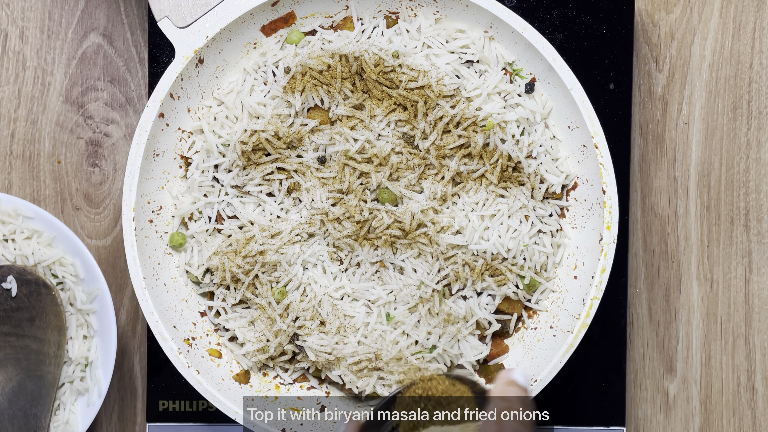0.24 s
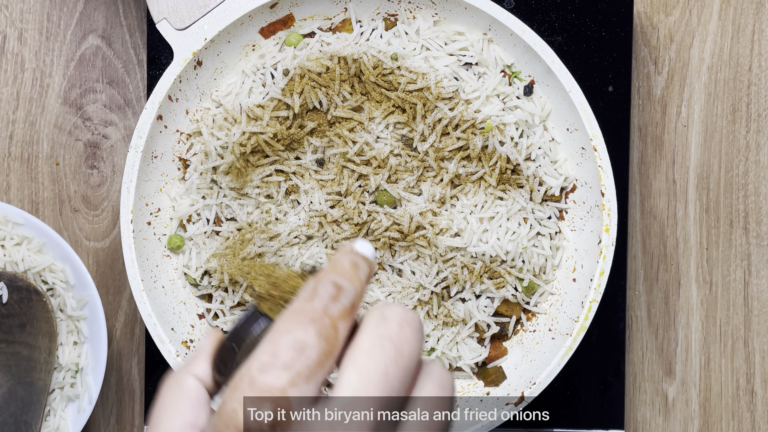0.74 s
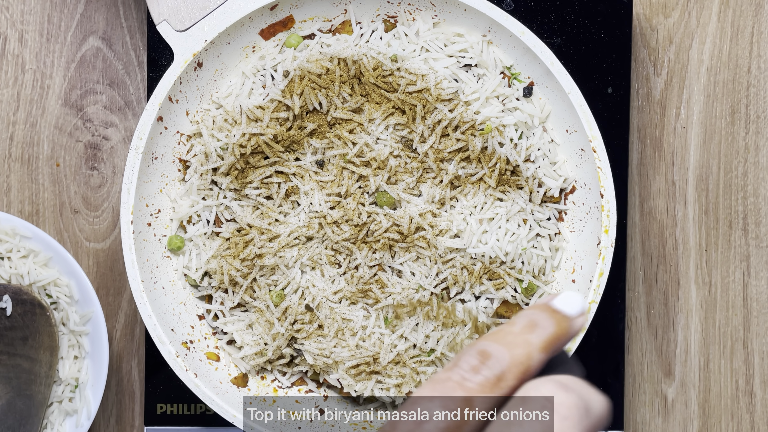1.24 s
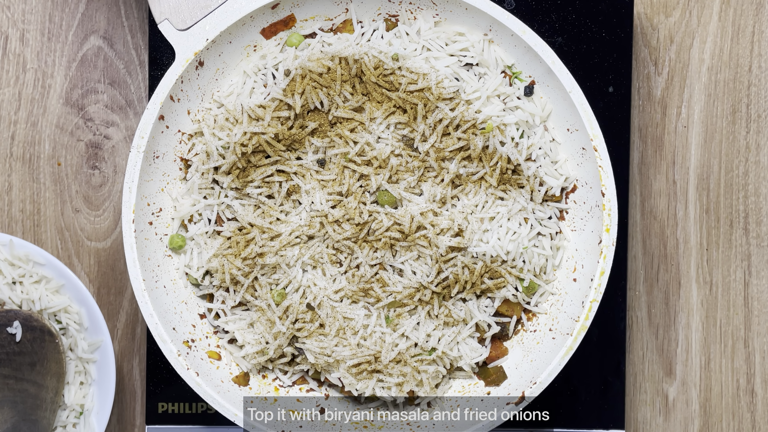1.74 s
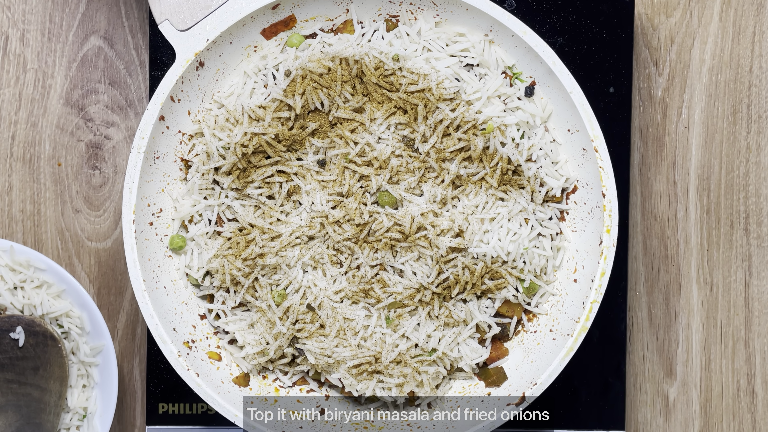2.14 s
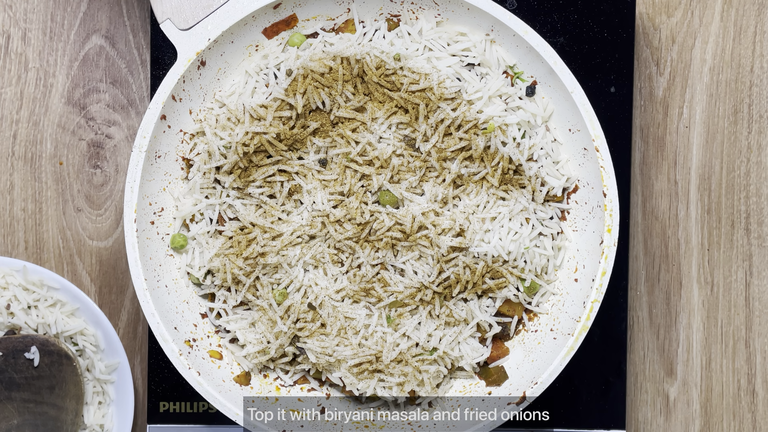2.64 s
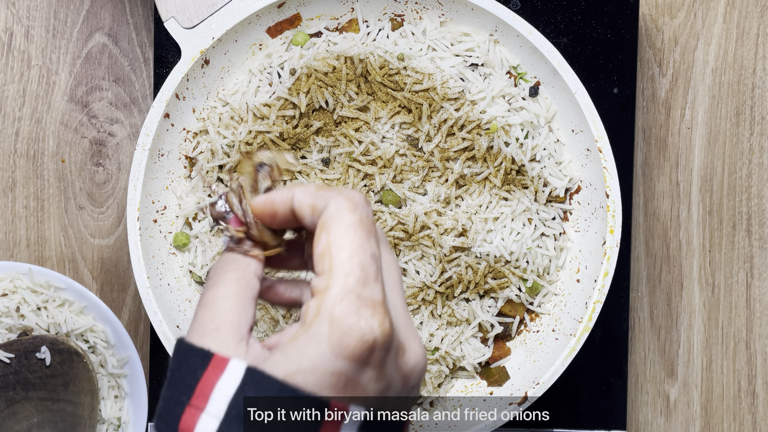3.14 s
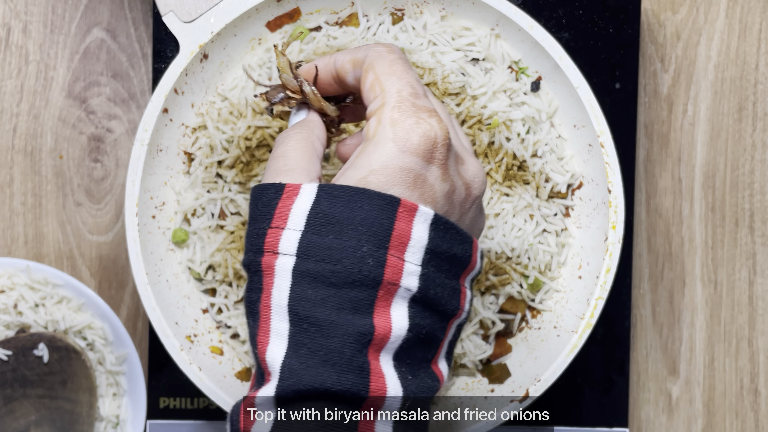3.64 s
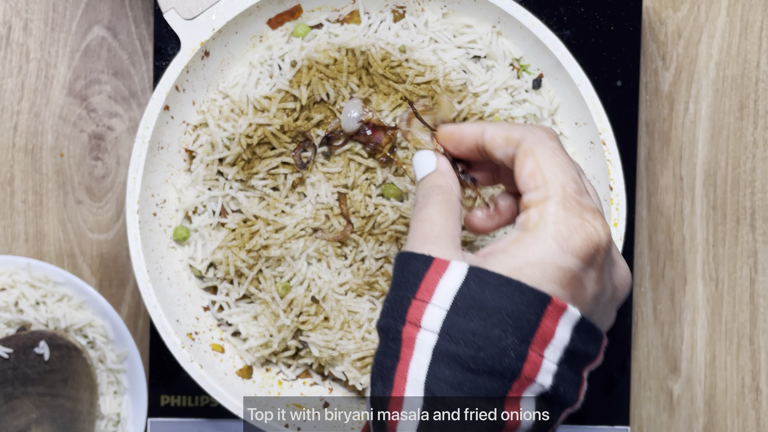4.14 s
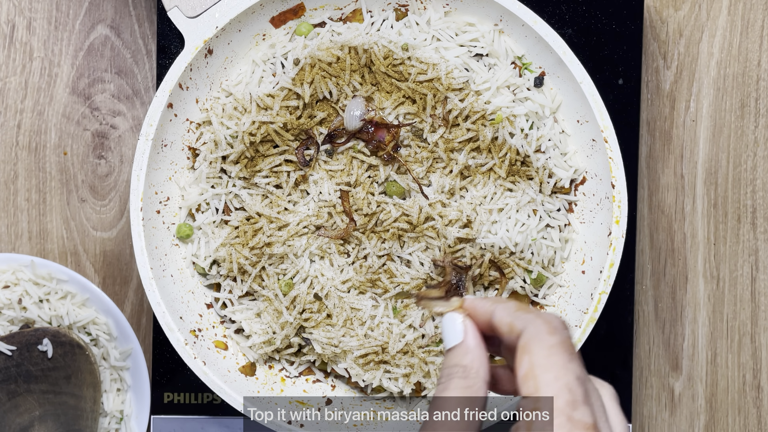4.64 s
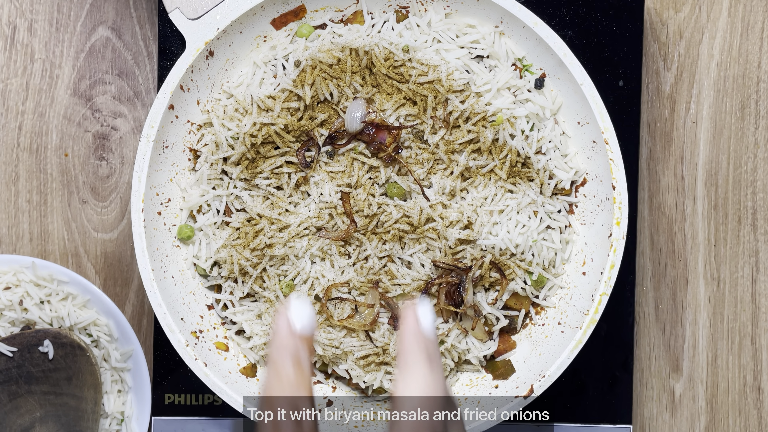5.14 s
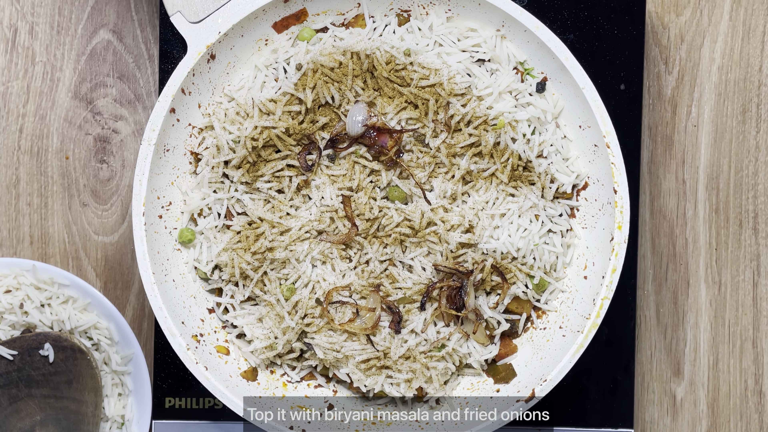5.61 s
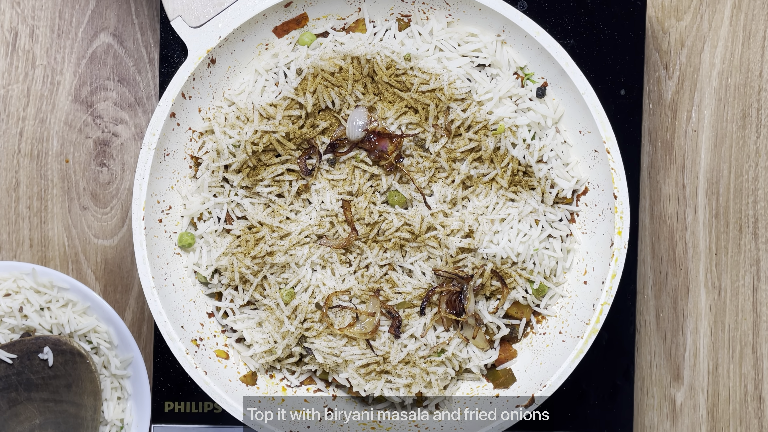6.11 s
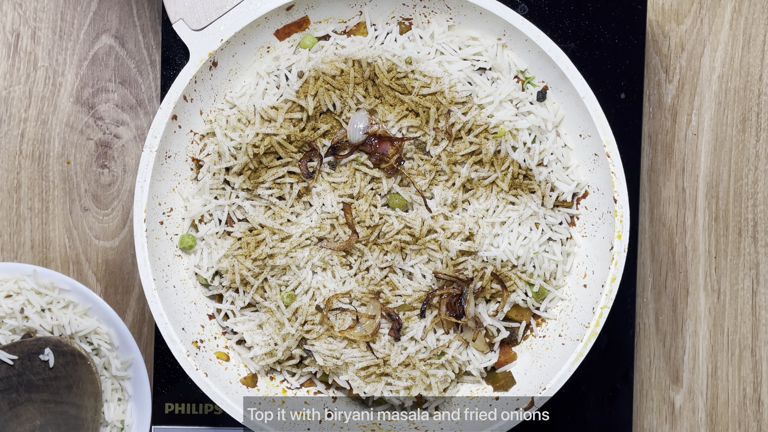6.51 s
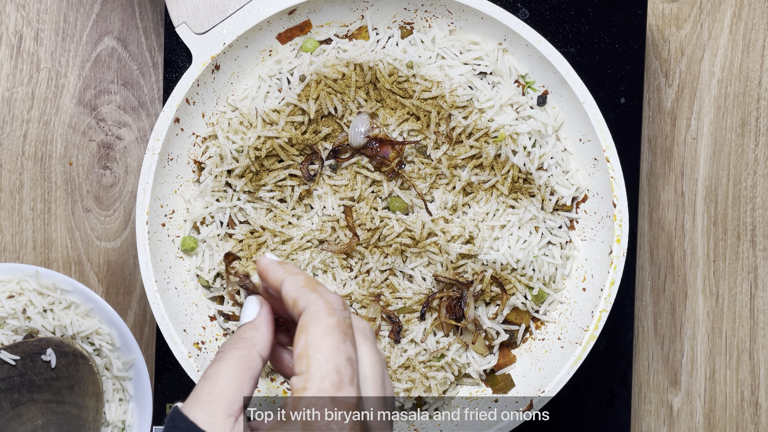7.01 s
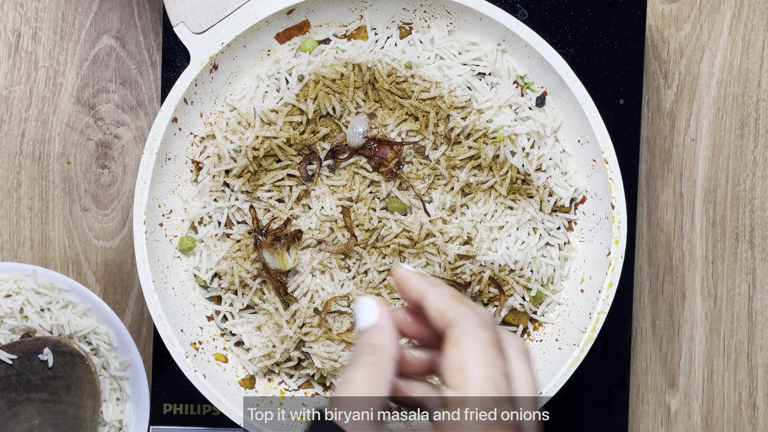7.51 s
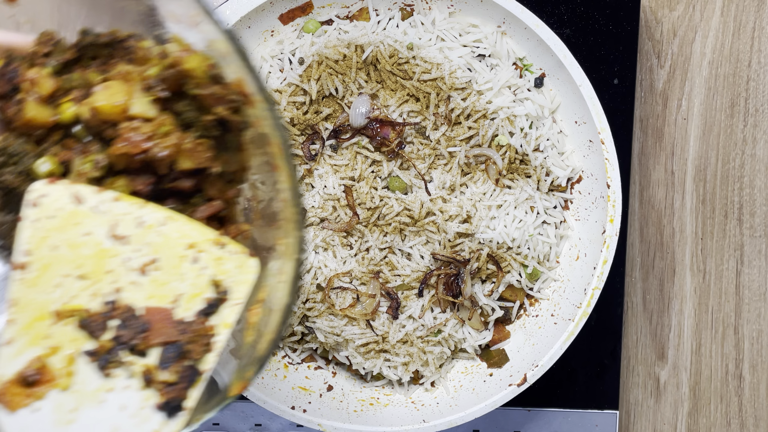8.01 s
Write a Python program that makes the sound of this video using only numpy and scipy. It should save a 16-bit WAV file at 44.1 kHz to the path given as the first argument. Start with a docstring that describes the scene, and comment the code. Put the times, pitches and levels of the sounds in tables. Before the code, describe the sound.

An induction cooktop's cooling fan rushes continuously, a low, boxy, humming airflow with weak blade tones and a faint whine near 1.2 kHz, heard close in wide stereo in a kitchen. From 0 s quiet bright sizzling lies over it, with small ringing pops, strongest around 1.1 to 1.25 s; a thin buzz throbbing at twice mains rate lasts until about 0.95 s. At 1.85 s comes a small hard tick with a tiny bounce, then light snaps until about 2.35 s. At 3.04 s the sound joins abruptly with a quick fade-in: sizzle nearly gone, the throbbing hiss returning and swelling. Sizzle creeps up from 4 s. At 5.77 s a dish is softly knocked, a brief double contact. Crackling flares at 6.7 s, 7.15 s and most strongly 7.7 s. At 7.82 s sizzle and buzz cut off, leaving plain fan rush to about 8.3 s.

```python
"""A cooling fan rushes and hums, as noise coloured by the resonances of case and room, in an induction cooktop.
Bright noise throbs at twice the mains rate in two sections; noise grains sizzle through three joined sections.
Ringing noise puffs crackle, decaying modes sound a tick and a knocked dish, sines give blade tones and whine.
Two microphone ports hear the bass alike and the treble shifted in phase; two sections fade in quickly at their joins."""
import sys
import numpy as np
from scipy import signal
from scipy.fft import rfft, irfft, next_fast_len
from scipy.io import wavfile
from scipy.ndimage import uniform_filter1d

SR = 44100
rng = np.random.default_rng(int(sys.argv[2]) if len(sys.argv) > 2 else 0)


def amplitude_ratio(level_db):
    """Convert a level in decibels to the matching linear amplitude (field) ratio."""
    exponent = np.asarray(level_db, float) / 20
    return 10 ** exponent


def persist_wave(psi):
    """Save psi, clipped to +-1, as 16-bit WAV."""
    counts = np.round(np.clip(psi, -1, 1) * 32767).astype(np.int16)
    wavfile.write(sys.argv[1], SR, np.atleast_2d(counts).T)


N = 364244
TIME_S, SIZE = np.arange(N) / SR, next_fast_len(N)
HZ = np.maximum(np.fft.rfftfreq(SIZE, 1 / SR), 1)

# fan air rush, relative spectrum: freq_hz, density_db
RUSH_SPECTRUM = [(28, -33), (44, -29), (54, -15), (130, -13), (200, -13), (300, -16), (420, -21),
                 (800, -23.5), (1000, -26.5), (2000, -32.5), (3300, -37.5), (4200, -37.5), (5800, -41.5),
                 (6600, -44.5), (8000, -45), (11000, -54.5), (16000, -49.5)]
# case and room, resonances up, nulls down: freq_hz, width_hz, gain_db
CASE_RESONANCES = [(56.3, 23.7, 8.5), (84.8, 12.7, 5), (97.3, 16.3, 7), (149.3, 4.7, 10),
                   (166.7, 13.7, 13.5), (188.8, 20.8, 10), (214.6, 23.8, -18), (259, 4.2, 0),
                   (267.6, 18, 6.5), (296, 10.7, 0), (324.1, 7.4, 10.5), (359.6, 9.9, -7.5),
                   (365.4, 25, 5.5), (559, 17, 2), (608, 29, 3.5), (878, 50, -4), (1076, 12.5, 7),
                   (1210, 51, 1.5), (1588, 84, 3.5), (1763, 224, -3.5), (1940, 46, 4), (2530, 380, 2.5),
                   (3000, 460, 3)]
FAN_DB = -28.5
RUSH_DB_PER_SIZZLE_DB = 0.023   # upper rush only

# throbbing hiss, by section: start_s, end_s, hiss_rms_db, start_below_db
HISS_SECTIONS = [(0, 0.953, -51, -2.5), (3.04, 7.822, -47, 9.5)]
HISS_RAMP_S = 0.43   # time constant
THROB_HZ, THROB_TURNS = 100.04, -0.49   # twice the mains rate, phase
THROB_SHARPNESS = [0.6, 1.25]   # below, above 10 kHz
# pan and glass resonances lit by the coil: freq_hz, width_hz, relative_db
COIL_RESONANCES = [(7280, 380, -1), (8100, 300, -5), (8530, 380, -1), (11650, 500, -2), (12150, 500, -6),
                   (12850, 350, -5), (13400, 400, -1), (14100, 300, -7), (15500, 700, -8)]
# sizzle through three joined sections: time_s, level_db
SIZZLE_LEVEL = [(0, -52), (1, -51), (1.6, -53.5), (3.03, -57), (3.06, -76), (4.3, -61), (5.5, -53.5),
                (6.3, -51), (7.2, -49), (7.82, -45.5), (7.825, -82), (8.26, -90)]
# sizzle flares: centre_s, length_s, above_level_db
SIZZLE_FLARES = [(6.677, 0.17, 6), (7.15, .3, 2), (7.715, 0.081, 7)]
# sizzle, relative spectrum: freq_hz, density_db
SIZZLE_SPECTRUM = [(2500, -25), (4000, -2), (5300, 10), (7000, 10.5), (10000, 6.5), (13000, 1),
                   (16000, -47)]

# pops ringing in the pan: time_s, ring_peak_db, ring_hz
PAN_POPS = [(.104, -30, 5570), (.2294, -26, 5500), (.4193, -30, 4410), (.5911, -30.5, 4840),
            (.6609, -30, 4460), (.7148, -30, 5200), (1.1348, -20.5, 4730), (1.155, -25, 5730),
            (1.2446, -20.5, 5550), (1.484, -26, 4550), (1.741, -28.5, 4630), (1.757, -28, 4480),
            (6.63, -26, 5570), (6.672, -23.5, 5500), (6.7223, -25, 5400), (6.996, -26, 5270),
            (7.0544, -31, 5600), (7.1916, -29, 5610), (7.6111, -31, 5630), (7.659, -28, 5060),
            (7.6989, -29, 5200), (7.7114, -26, 5200), (7.8082, -26, 5100)]
POP_TREBLE_DB = -7.5   # noise scale re ring peak
# thin bright snaps: time_s, noise_scale_db
BRIGHT_SNAPS = [(.8929, -30), (1.011, -32.5), (1.072, -35), (1.3137, -32), (1.457, -30.5), (1.648, -36),
                (1.7918, -35), (1.8387, -36), (1.889, -35), (1.9612, -33), (2.0235, -32), (2.0986, -34),
                (2.155, -36), (2.2322, -36), (2.2937, -37), (2.354, -32), (5.545, -30), (5.832, -31),
                (7.1008, -31), (7.3592, -24.5), (7.5278, -31)]
SNAP_RING_DB, RING_RANGE_HZ = -12, (4000, 5870)   # ring peak re noise scale
# chance pops: most per second, sizzle level at which half occur, ring peak and its half range
SMALL_PER_S, SMALL_SIZZLE_DB, SMALL_DB, SMALL_SPREAD_DB = 24, -50, -33.5, 0.5

# dish knock and bounce: time_s, relative_db
DISH_CONTACTS = [(5.7658, -25), (5.7703, -30)]
# dish modes: freq_hz, relative_db, t60_s
DISH_MODES = [(1070, -10, .15), (1300, -12, .04), (1385, -9, .07), (1445, -1, .09), (1575, -10, .08),
              (1750, -11, .08), (1922, -6, .11), (2085, -11, .08), (2434, -1, .11), (2530, -11, .07),
              (2720, -9, .06), (2820, -9, .06), (3330, -13, .05)]
# hard tick contacts: time_s, relative_db
TICK_CONTACTS = [(1.8526, 0), (1.8532, -1), (1.858, -8), (1.863, -10)]
# small hard object's modes: freq_hz, relative_db, t60_s
TICK_MODES = [(3550, -25, .01), (2600, -36, .008), (4300, -37, .008), (1150, -33, .015)]

BLADE_HZ = 240   # mean
# blade tones: blade_rate_multiple, median_rms_db
BLADE_HARMONICS = [(1, -54.5), (2, -54.5), (3, -51.5)]
# motor whine through the joined sections: time_s, pitch_hz
WHINE_PITCH = [(0, 1222), (1.2, 1240), (2, 1250), (3.03, 1238), (3.06, 1218), (5.3, 1212), (6, 1200),
               (7.82, 1190), (7.85, 1215), (8.26, 1226)]
WHINE_CARRIER_DB, WHINE_THROB_DEPTH = -55.5, 1.2   # median rms before throb

# port pair, bass and middle: freq_hz, shared_power_0_to_1, left_minus_right_db
PORT_SHARE = [(30, .9999, 0), (90, 1, -0.5), (197, .994, 0), (350, 0.94, 0.4), (665, 0.61, -2.5),
              (1250, 0.62, -4), (2320, 0.72, 2.5), (3030, 0.16, 1), (4080, 0.48, 1.5), (5270, 0.47, 1),
              (6300, 0.9, -0.5)]
# port pair, treble: freq_hz, shared_power_0_to_1, left_minus_right_db
PORT_TREBLE_SHARE = [(6900, .99, 0), (8200, .99, 0), (9300, .9, 0), (10300, .99, 0), (11700, .99, 0),
                     (12700, .9, 0), (13800, .99, 0), (16500, .99, 0)]
# phase between left and right, flat around the treble nulls: freq_hz, half_turns
PORT_PHASE = [(60, 0), (1550, .06), (2760, .45), (3790, .05), (5300, .1), (6200, .42), (7150, .94),
              (8150, 1.06), (8700, 1.3), (10400, 1.94), (11450, 2.06), (12500, 2.4), (13300, 2.68),
              (13900, 2.95), (15000, 3.05), (15600, 3.3)]
# two joins between sections, each fading in quickly: time_s, fade_s
SECTION_JOINS = [(3.038, 0.024), (7.822, 0.025)]
TOP_CUT_HZ = 15800


def rms_one(x):
    """Scale to rms 1."""
    return x / np.sqrt(np.mean(x ** 2) + 1e-20)


def along(rows, at, scale=lambda v: v):
    """Table columns, interpolated linearly on the scaled first column."""
    first, *columns = np.transpose(rows)
    return [np.interp(scale(at), scale(first), column) for column in columns]


def bell(hz, width_hz):
    """Resonance curve, peak 1."""
    return 1 / (1 + (2 * (HZ - hz) / width_hz) ** 2)


def drift(rate_hz):
    """Random fluctuation of about rms 1: noise at 40 points/s through two equal poles."""
    points = rng.standard_normal(int(N / SR * 40) + 400)
    pole = np.exp(-2 * np.pi * rate_hz / 40)
    slow = signal.lfilter([1], [1, -2 * pole, pole * pole], points)[390:]   # skip the onset
    return np.interp(TIME_S * 40, np.arange(len(slow)), rms_one(slow))


def coloured(x, gain):
    """Filter by a gain per frequency."""
    return irfft(rfft(x, SIZE) * gain, SIZE)[..., :N]


def ring(clicks, hz, t60_s):
    """Two-pole resonator: a unit click starts a decaying sine of height 1."""
    pole, w = amplitude_ratio(-60 / (t60_s * SR)), 2 * np.pi * hz / SR
    return signal.lfilter([0, np.sin(w)], [1, -2 * pole * np.cos(w), pole * pole], clicks + 1e-18)


def three_noises():
    """White noise: one shared by both ports, one diffuse for each."""
    return rng.standard_normal((3, N))


def sizzle_db():
    """Sizzle level by section plus smooth flares."""
    flares_db = sum(db * np.exp(-(2 * (TIME_S - s) / length_s) ** 2) for s, length_s, db in SIZZLE_FLARES)
    return along(SIZZLE_LEVEL, TIME_S)[0] + flares_db


def fan():
    """Turbulent rush coloured by case and room; its upper part rises slightly with the sizzle level."""
    colour_db = along(RUSH_SPECTRUM, HZ, np.log)[0]
    colour_db = colour_db + sum(db * bell(hz, width_hz) for hz, width_hz, db in CASE_RESONANCES)
    rush = rms_one(coloured(three_noises(), amplitude_ratio(colour_db)))
    upper = signal.sosfilt(signal.butter(1, 600, "high", fs=SR, output="sos"), rush)
    level_db = sizzle_db()
    swell_db = RUSH_DB_PER_SIZZLE_DB * (level_db - level_db.mean()) + 0.5 * drift(5.7)
    return amplitude_ratio(FAN_DB + 0.5 * drift(3.3)) * (rush + (amplitude_ratio(swell_db) - 1) * upper)


def coil():
    """Hiss swells once per mains half wave; grains of fat sizzle with a weaker throb."""
    hiss_gain = np.zeros(N)
    for start_s, end_s, db, below_db in HISS_SECTIONS:
        ramp_db = below_db * np.exp(-np.abs(TIME_S - start_s) / HISS_RAMP_S)
        hiss_gain += (TIME_S >= start_s) * (TIME_S < end_s) * amplitude_ratio(db - ramp_db)
    wave = np.cos(2 * np.pi * (THROB_HZ * TIME_S + THROB_TURNS))
    peaks = np.sqrt(sum(amplitude_ratio(2 * db) * bell(hz, width_hz) ** 2 for hz, width_hz, db in COIL_RESONANCES))
    hiss = np.zeros((3, N))
    for band, sharpness in zip([HZ < 1e4, HZ >= 1e4], THROB_SHARPNESS):
        hiss += coloured(three_noises(), peaks * band) * np.exp(sharpness * (wave - 0.5) / 2)
    hiss = rms_one(hiss)
    grain_db = 5.3 * np.minimum(rng.exponential(1, N), 5.5)
    grains = three_noises() * amplitude_ratio(grain_db) * np.exp(0.22 * wave)
    sizzle = rms_one(coloured(grains, amplitude_ratio(along(SIZZLE_SPECTRUM, HZ, np.log)[0])))
    return hiss_gain * amplitude_ratio(0.73 * drift(3.4)) * hiss + amplitude_ratio(sizzle_db() + 2.2 * drift(21)) * sizzle


def small_pops():
    """Chance pops, likelier in loud sizzle: time_s, ring_peak_db, ring_hz."""
    level_db, pops = sizzle_db(), []
    for place, birth, pitch, size in rng.random((round(SMALL_PER_S * N / SR), 4)):
        if birth < 1 / (1 + amplitude_ratio(SMALL_SIZZLE_DB - level_db[int(place * N)]) ** 4):
            peak_db = SMALL_DB + SMALL_SPREAD_DB * (2 * size - 1)
            pops.append((place * N / SR, peak_db, np.interp(pitch, [0, 1], RING_RANGE_HZ)))
    return pops


def crackles():
    """Noise puffs: part rings a short resonance at its own pitch, part stays bright."""
    out, after_s = np.zeros((3, N + 700)), np.arange(700) / SR
    high = signal.butter(2, 5000, "high", fs=SR, output="sos")
    decay = np.exp(-after_s / 0.00075) + 0.21 * np.exp(-after_s / 0.009)
    rows = [(s, db, hz, db + POP_TREBLE_DB) for s, db, hz in list(PAN_POPS) + small_pops()]
    rows += [(s, db + SNAP_RING_DB, rng.uniform(*RING_RANGE_HZ), db) for s, db in BRIGHT_SNAPS]
    for s, ring_db, hz, treble_db in rows:
        i = round(s * SR)
        puff = rng.standard_normal((3, 700)) * decay
        tone = ring(ring(puff, hz, 0.0016), hz, 0.0016)
        bright = signal.sosfilt(high, puff)
        out[:, i:i + 700] += amplitude_ratio(ring_db) * tone / np.abs(tone).max() + amplitude_ratio(treble_db) * bright
    return out[:, :N]


def taps():
    """Soft contacts ring the dish, hard ones the small object; walls return a short noise tail."""
    contact, tick = np.zeros(N), np.zeros(N)
    for s, db in DISH_CONTACTS:
        contact[round(s * SR)] = amplitude_ratio(db)
    for s, db in TICK_CONTACTS:
        tick[round(s * SR)] = amplitude_ratio(db)
    soft = np.convolve(contact, np.hanning(19))[:N]
    direct = np.zeros(N)
    for k, (hz, db, t60_s) in enumerate(DISH_MODES):
        direct += (-1) ** k * amplitude_ratio(db - 17) * ring(soft, hz, t60_s)   # neighbours start in opposite sense
    for hz, db, t60_s in TICK_MODES:
        direct += amplitude_ratio(db) * ring(tick, hz, t60_s)
    after_s = np.arange(6000) / SR
    walls = rng.standard_normal((3, 6000)) * np.exp(-after_s / 0.016) * amplitude_ratio(-31)
    return direct + signal.fftconvolve(direct[None], walls)[:, :N]


def blades():
    """Blade-rate harmonics and throbbing motor whine; blade speed and all levels waver."""
    turn = 2 * np.pi * np.cumsum(BLADE_HZ * (1 + 0.00376 * drift(0.755))) / SR
    tones = np.zeros((3, N))
    for k, db in BLADE_HARMONICS:
        phase = rng.uniform(0, 2 * np.pi, (3, 1))
        tones += np.sqrt(2) * amplitude_ratio(db + 2.4 * drift(3.4)) * np.sin(k * turn + phase)
    throb = 1 + WHINE_THROB_DEPTH * np.cos(2 * np.pi * THROB_HZ * TIME_S)
    whine = np.sin(2 * np.pi * np.cumsum(along(WHINE_PITCH, TIME_S)[0]) / SR)
    return tones + np.sqrt(2) * amplitude_ratio(WHINE_CARRIER_DB + 2 * drift(1.3)) * throb * whine


def ports(field):
    """Shared sound differs in phase between the ports, so their sum has treble nulls; the rest is diffuse."""
    share, balance_db = along(list(PORT_SHARE) + list(PORT_TREBLE_SHARE), HZ, np.log)
    share, half_turns = np.clip(share, 0, 1), along(PORT_PHASE, HZ, np.log)[0]
    side = np.array([[1], [-1]])
    shared = rfft(field[0], SIZE) * np.exp(0.5j * np.pi * half_turns * side)
    diffuse = rfft(field[1:], SIZE) * np.array([[1], [1j]])   # right turned a quarter
    heard = np.sqrt(share) * shared + np.sqrt(1 - share) * diffuse
    return irfft(amplitude_ratio(side * balance_db / 2) * heard, SIZE)[:, :N]


def scene():
    """All sources at the two ports."""
    return ports(fan() + coil() + crackles() + taps() + blades())


def roll_off(x):
    """The treble ends steeply here."""
    return signal.sosfilt(signal.butter(12, 16510, fs=SR, output="sos"), x)


def record(dry):
    """Fades in quickly at the two section joins; the top is cut."""
    gain = np.ones(N)
    for s, fade_s in SECTION_JOINS:
        gain *= np.where(TIME_S < s, 1, np.clip((TIME_S - s) / fade_s, 0.12, 1))
    mix = coloured(dry * uniform_filter1d(gain, size=44), HZ < TOP_CUT_HZ)
    return roll_off(mix)


dry = scene()
out = record(dry)
persist_wave(out)
```